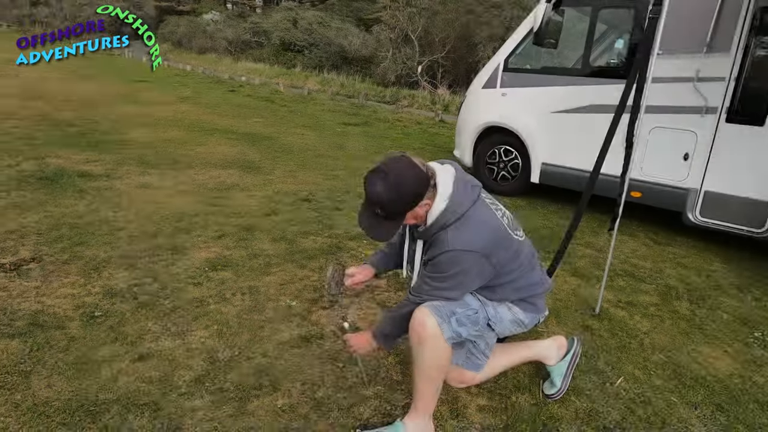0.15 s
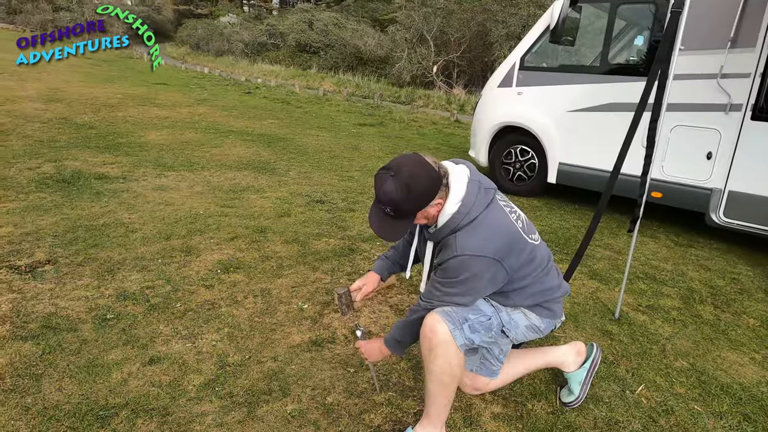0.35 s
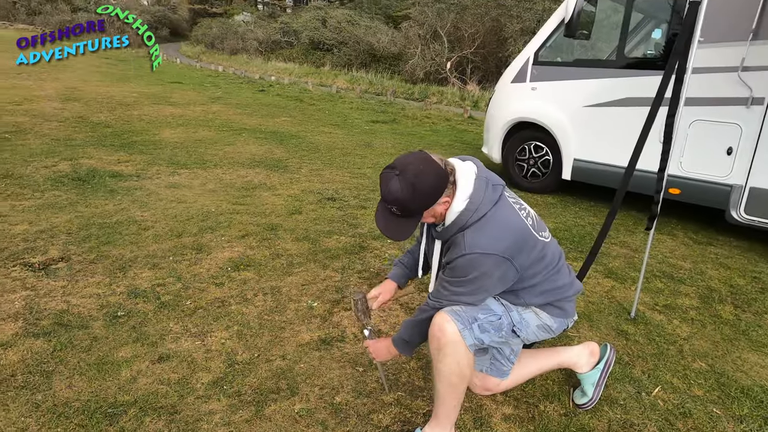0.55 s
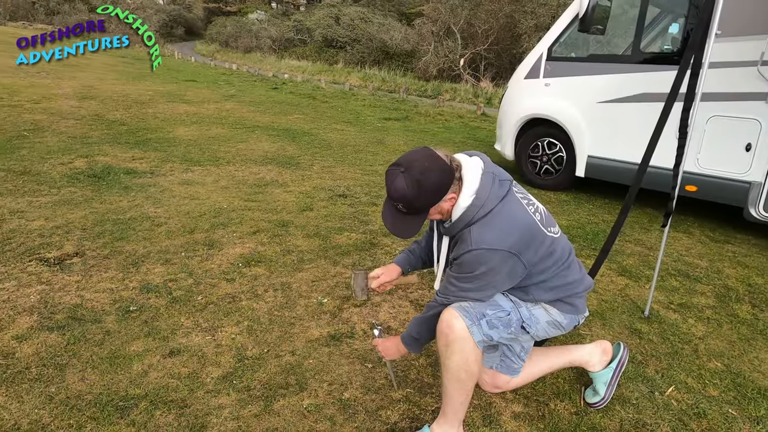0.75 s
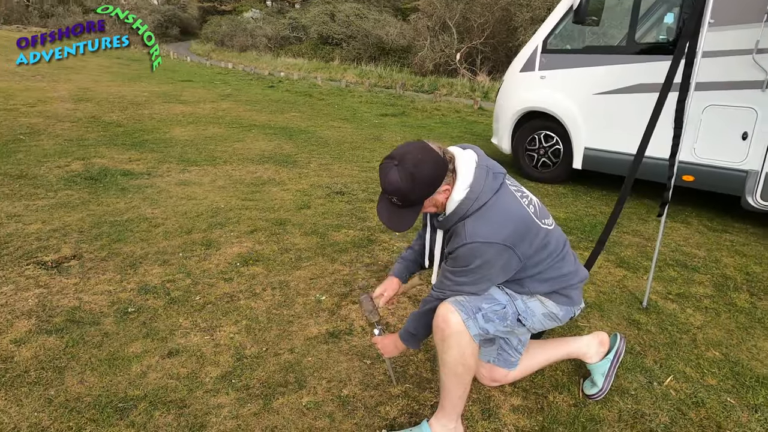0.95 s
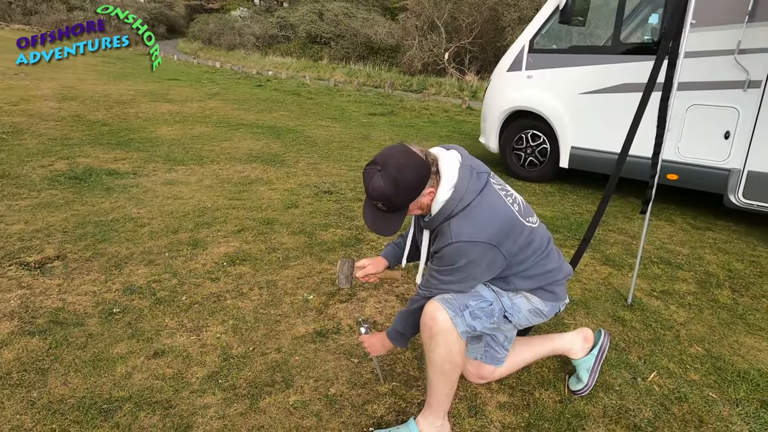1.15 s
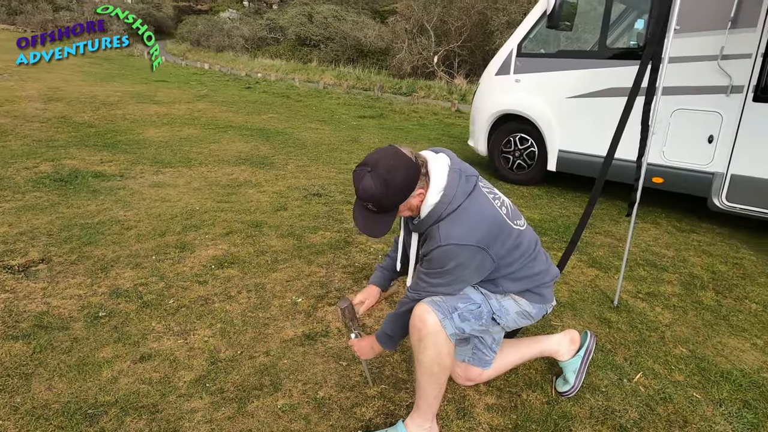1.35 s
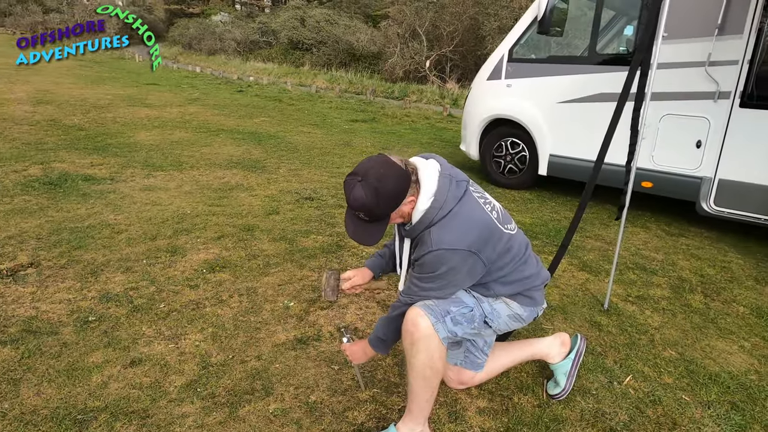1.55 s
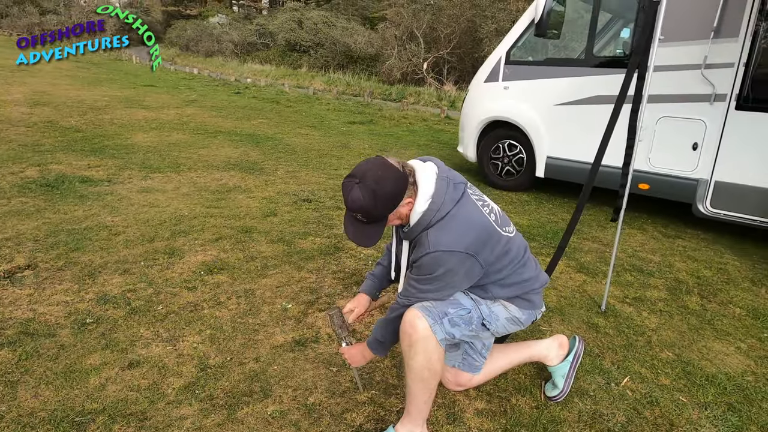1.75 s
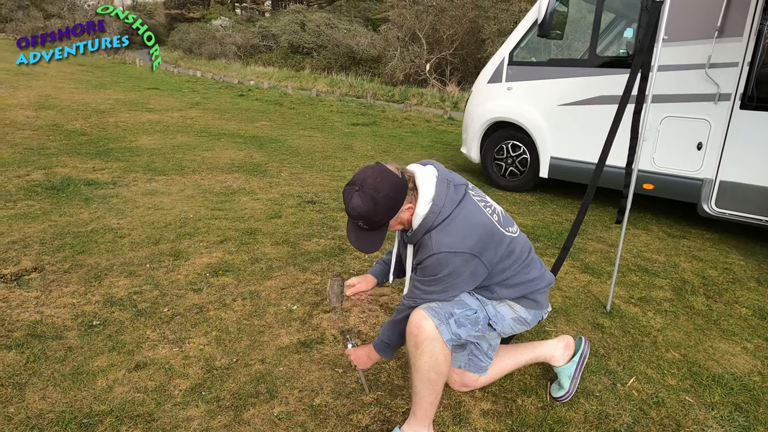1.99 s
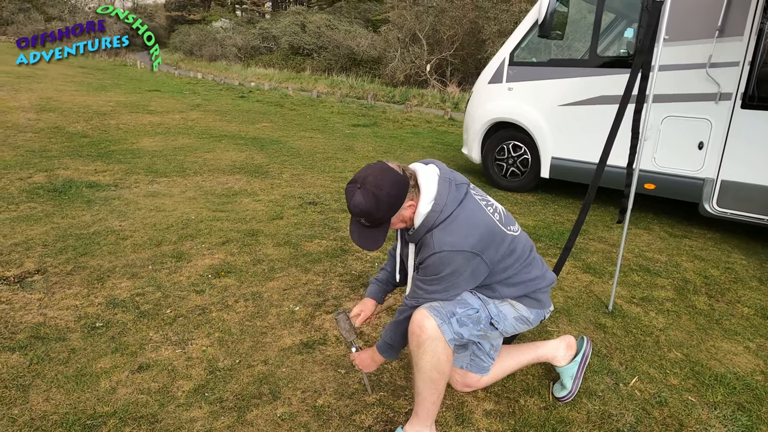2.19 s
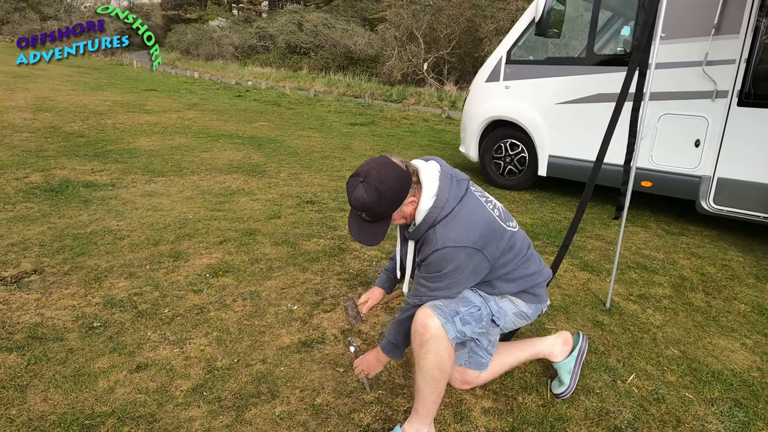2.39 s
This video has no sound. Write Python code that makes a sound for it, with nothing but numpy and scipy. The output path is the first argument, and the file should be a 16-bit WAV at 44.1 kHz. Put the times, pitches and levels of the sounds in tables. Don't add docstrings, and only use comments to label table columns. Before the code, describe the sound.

Seven sharp, bright hammer blows on a metal peg in grassy soil, roughly every 0.4 seconds, each with a brief clink and outdoor echo, over low rumble; stereo microphone a few metres away.

```python
import sys
import numpy as np
from scipy import signal
from scipy.fft import rfft, irfft, next_fast_len
from scipy.io import wavfile
from scipy.ndimage import uniform_filter1d

SR = 44100
rng = np.random.default_rng(int(sys.argv[2]) if len(sys.argv) > 2 else 0)


def elevation(decibels):
    levels = np.asarray(decibels, float)
    return 10 ** (levels / 20)


def bounce(signal):
    frames = np.transpose(np.atleast_2d(signal))
    limited = np.clip(frames, -1, 1)
    pcm = np.round(limited * 32767).astype(np.int16)
    wavfile.write(sys.argv[1], SR, pcm)


N = 106986

BLOW_START_S = [.0058, .3602, .6979, 1.0691, 1.463, 1.8727, 2.2979]
# strength in dB, brightness in dB, chatter length in seconds.
BLOW_STEEL = [(-6, -22, 0.011), (-4, -16, 0.0069), (-5, -12, 0.011), (-3.5, -19, 0.0071), (-4, -17, 0.006),
              (-3, -14.5, 0.0054), (-4.5, -19, 0.0052)]
# head ring in dB, main peg ring in dB, low body in dB, echo in dB.
BLOW_LANDING = [(-5.5, -11.5, -7.5, -1.2), (2.5, 2.5, -6.6, -1.24), (-1.5, -1.5, -0.5, 0),
                (-5, -4, -7, -2.95), (-2.5, -3, -5.7, -1), (6.5, -1.5, -3, -1.3), (18, -5.5, -3.5, .1)]
MAIN_RING_HZ = [3290, 3345, 3250, 3360, 3420, 3360, 3090]
TOP_HEAD_RING_DB = [-14, -12, -8, -7, 1, -12, 5]
# peak in dB, rebound frequency in Hz.
SOIL_THUMPS = [(-44.5, 230), (-36.5, 164), (-36, 250), (-30.5, 160), (-26, 177.4), (-26.5, 170),
               (-25.5, 165)]
REBOUND_DELAY_S = [.018, .02, .02, .0194, .0185, .0173, .0166]
PEG_RING_HZ = [1300, 1480, 2300, 2850, 4220, 5150, 5800, 7080, 7770, 8510, 9490, 10930, 13150]
# level in dB, T60 in seconds.
PEG_RINGS = [(-20, 0.032), (-13.5, .014), (-18.5, 0.06), (-52.5, 0.042), (-5.5, 0.013), (-18.5, 0.025),
             (-25, 0.012), (-0.5, 0.0053), (-32.5, 0.0053), (-14.5, 0.014), (-18.5, 0.0092), (-22, 0.033),
             (-31.5, 0.02)]
HEAD_RING_HZ = [3360, 5200, 7090, 8505, 12090]
# level in dB, T60 in seconds.
HEAD_RINGS = [(-69.5, 0.78), (-64, 0.27), (-70, 0.4), (-68.5, 0.92), (-63.5, .55)]
# frequency in Hz, level in dB.
CRACK_SPECTRUM = [(600, -47.5), (950, -28), (1300, -3.5), (2001, 7), (3700, 6.7), (5501, 2.5), (9001, -8.5),
                  (15000, -40.5)]
# frequency in Hz, level in dB.
SOIL_SPECTRUM = [(50, -13.5), (100, -0.5), (250, 1.5), (500, -18.5), (1000, -50.5)]
# delay in seconds, level in dB, smear in seconds.
WALL_ECHOES = [(0.0201, -14, 0.0065), (0.045, -29.5, 0.0027), (0.068, -29.5, 0.017), (0.131, -42.5, 0.0056)]
# frequency in Hz, T60 in seconds.
FIELD_T60 = [(300, .2), (1000, .3), (2500, .42), (5000, .36), (9000, .27), (14000, .2)]
# frequency in Hz, level in dB.
FAR_AIR_LOSS = [(3500, 0), (6000, -11), (10000, -28)]
# frequency in Hz, level in dB.
ECHO_SPECTRUM = [(200, -10.5), (800, 6.5), (2301, 1.5), (3400, -1), (6001, -3.5), (10002, -2.54),
                 (14001, -17)]
# middle in seconds,
# length in seconds, level in dB, centre in Hz.
RUSTLES = [(0.088, 0.28, -64, 2500), (0.202, .07, -56.5, 1852), (0.807, 0.48, -68.5, 2200),
           (0.982, 0.12, -57.5, 2070), (2.244, 0.17, -76, 2690), (2.344, 0.051, -43, 960),
           (0.292, 0.075, -68.5, 2600), (0.604, 0.43, -78.5, 3387), (2.359, 0.042, -42, 200)]
# start in seconds, level in dB, frequency in Hz.
KNOCKS = [
    (.052, -50.5, 600),
    (0.96, -39.5, 592),
]
# frequency in Hz, level in dB per Hz.
AIR_SPECTRUM = [(18, -32.5), (30, 3), (59, -7), (102, -18), (200, -14.5), (524, -42), (1090, -38),
                (2370, -49), (15000, -77.5)]
# frequency in Hz, likeness from 0 to 1.
AIR_LIKENESS = [(30, 0.71), (100, 1), (300, 0.62), (2000, 0.17), (10000, 0.45)]
# frequency in Hz, level in dB.
RIGHT_LIFT_DB = [(500, .3), (1500, .4), (3000, -.3), (5000, .7), (8500, 3), (13000, 2.5)]
# frequency in Hz, phase in radians.
LEFT_PHASE_RAD = [(100, 0), (700, -.25), (1400, -.45), (2800, -.8), (5600, -1.55), (7300, -1.9),
                  (9000, -.9), (12000, -1.7)]
# frequency in Hz, level in dB.
MIC_ROLLOFF = [(13000, 0), (15000, -10), (16300, -40)]
# lead in seconds, level in dB, smear in seconds.
PRE_LEAKS = [(.0109, -24, .0005), (.0215, -38, .001), (.014, -40, .006)]

CONTACTS_PER_S, CONTACT_RISE_S, CONTACT_SPREAD_DB, CHATTER_FALL_DB = 6000, .0008, 2.5, -7
MAIN_T60_S, MODE_SPREAD_DB, CRACK_DB, ECHO_RING_DB = .03, 2, 17, -11
PUSH_HZ, PUSH_S, PUSH_WIDTH_S = 255, .0052, .002
REBOUND_DB, REBOUND_WIDTH_S, REBOUND_T60_S = 2.7, .004, .022
SHUDDER_DB, SHUDDER_T60_S = -8, .22
FIELD_DB, FIELD_START_S, FIELD_RISE_S = -18.5, .0098, .0065
FIELD_END_S, FIELD_END_DB = .113, -7
FAR_DB, FAR_T60_S = -48.5, 2.3
AIR_DB, PATCH_DB, GUST_DB = -53, 4.7, 4.5
HUM_HZ, HUM_WIDTH_HZ, HUM_DB = 47, 18, -60
LEAD_IN_S = .5


def read(points, hz):
    f, value = np.transpose(points)
    return np.interp(np.log(hz + 1), np.log(f + 1), value)


def evened(x):
    return x / np.sqrt(np.mean(x ** 2) + 1e-20)


def add(mix, s, sound):
    part = mix[..., round(max(s, 0) * SR):][..., :sound.shape[-1]]
    part += sound[..., :part.shape[-1]]


def colour(x, points, sign=1, phase=((1, 0),), causal=False):
    size = 2 * next_fast_len(x.shape[-1] // 2 + 2048)
    hz = np.fft.rfftfreq(size, 1 / SR)
    gain = elevation(sign * read(points, hz))
    turn = read(phase, hz)
    if causal:
        log_gain = np.log(np.r_[gain, gain[-2:0:-1]])
        turn = -signal.hilbert(log_gain).imag[:len(hz)]
    return irfft(rfft(x, size) * gain * np.exp(1j * turn), size)[..., :x.shape[-1]]


def ring(hz, db, t60_s, count):
    t = np.arange(count) / SR
    return elevation(db - 60 * t / t60_s) * np.sin(2 * np.pi * hz * t)


def chatter(length_s):
    chance, side, size = rng.random((3, 800))
    t = np.arange(800) / SR
    hold = np.minimum(t / CONTACT_RISE_S + .3, 1) * elevation(CHATTER_FALL_DB * t / length_s)
    hold = hold / (1 + (t / length_s) ** 8)
    hits = (chance < CONTACTS_PER_S / SR) * np.sign(side - .5)
    return hits * elevation(-CONTACT_SPREAD_DB * np.log(size + .05)) * hold


def peg_ring(main_hz, main_db):
    vary_db = MODE_SPREAD_DB * rng.standard_normal(len(PEG_RINGS))
    peg = ring(main_hz, main_db, MAIN_T60_S, count=20000)
    for hz, (db, t60_s), change_db in zip(PEG_RING_HZ, PEG_RINGS, vary_db):
        peg = peg + ring(hz, db + change_db, t60_s, count=20000)
    return peg


def head_ring(head_db, top_db, count):
    head = np.zeros(count)
    for hz, (db, t60_s) in zip(HEAD_RING_HZ, HEAD_RINGS):
        lift_db = top_db if hz == HEAD_RING_HZ[-1] else head_db
        head = head + ring(hz, db + lift_db, t60_s, count)
    return head


def blow(db, bright_db, chatter_s, main_hz, top_db, head_db, main_db, body_db, echo_db):
    contacts = chatter(chatter_s)
    peg = peg_ring(main_hz, main_db)
    sound = signal.fftconvolve(contacts[None], peg[None], axes=1) * elevation([[0], [ECHO_RING_DB]])
    crack = colour(np.pad(contacts, (0, 500)), CRACK_SPECTRUM, causal=True)
    add(sound, 0, elevation(CRACK_DB) * crack)
    tilt = [(2400, body_db), (3000, 0), (4500, 0), (7000, bright_db + 16)]
    sound = colour(sound, tilt, causal=True)
    head = head_ring(head_db, top_db, sound.shape[1])
    steel = sound / np.linalg.norm(sound, axis=1)[:, None] * 5 * elevation([[0], [echo_db]])
    return elevation(db) * (steel + head * [[1], [0]])


def thump(delay_s, db, hz):
    t = np.arange(12000) / SR
    since_push = t - PUSH_S
    push = np.exp(-(since_push / PUSH_WIDTH_S) ** 2)
    push = push * np.sin(2 * np.pi * PUSH_HZ * since_push * (1.3 - 40 * t))
    u = t - delay_s
    fade = np.where(u < 0, np.exp(-(u / REBOUND_WIDTH_S) ** 2), elevation(-60 * u / REBOUND_T60_S))
    rebound = elevation(REBOUND_DB) * fade * np.cos(2 * np.pi * hz * u)
    shudder = evened(colour(rng.standard_normal(len(t)), SOIL_SPECTRUM))
    shudder = shudder * np.clip(t / delay_s, 0, 1) * elevation(SHUDDER_DB - 60 * t / SHUDDER_T60_S)
    return elevation(db) * (push - rebound + shudder)


def surroundings():
    t = np.arange(SR // 2) / SR
    shared = rng.standard_normal((3, len(t)))
    taps = .8 * shared[0] + .6 * shared[1:]
    walls = np.zeros(len(t))
    for delay_s, db, smear_s in WALL_ECHOES:
        smear = np.exp(-np.maximum(t - delay_s, 0) / smear_s) / np.sqrt(smear_s * SR / 2)
        walls = walls + elevation(db) * (t > delay_s) * smear
    hz, frame_s, z = signal.stft(rng.standard_normal((2, len(t))), SR, nperseg=256)
    near_db = FIELD_DB + FIELD_END_DB * (frame_s > FIELD_END_S)
    near_db = near_db - 60 * frame_s / read(FIELD_T60, hz)[:, None]
    far_db = FAR_DB + read(FAR_AIR_LOSS, hz)[:, None] - 60 * frame_s / FAR_T60_S
    tail = z * (elevation(near_db) + elevation(far_db))
    field = signal.istft(tail, SR, nperseg=256)[1][:, :len(t)] / 30
    onset = np.clip((t - FIELD_START_S) / FIELD_RISE_S, 0, 1)
    return colour(taps * walls + field * onset, ECHO_SPECTRUM)


def rustle(length_s, db, hz):
    count = 12000
    t = np.arange(count) / SR - count / SR / 2
    grains = rng.standard_normal((2, count)) * elevation(rng.exponential(1, (2, count)))
    spectrum = [(hz / 4, -25), (hz * .53, -1.5), (hz * 1.2, -1.5), (hz * 4, -22), (hz * 8, -45)]
    band = colour(grains + 2.1 * grains[::-1], spectrum)
    return elevation(db) * evened(band) * np.exp(-(2 * t / length_s) ** 2)


def knock(db, hz):
    return sum(ring(k * hz, db - 3 * k, .012, count=2000) for k in (1, 1.7, 2.4, 3.2))


def air():
    size, hop = 2048, 256
    hz = np.fft.rfftfreq(size, 1 / SR)
    a, b, c, d, patches = rng.standard_normal((N // hop + 5, len(hz), 5)).T
    patches = uniform_filter1d(uniform_filter1d(patches, size=10, axis=0), size=12, axis=1)
    level = elevation(read(AIR_SPECTRUM, hz)[:, None] + PATCH_DB * evened(patches))
    same = np.clip(read(AIR_LIKENESS, hz), -1, 1)[:, None]
    left = a + 1j * b
    right = same * left + np.sqrt(1 - same ** 2) * (c + 1j * d)
    z = np.array([left, right]) * level
    wash = evened(signal.istft(z, nperseg=size, noverlap=size - hop)[1][:, :N])
    f = np.fft.rfftfreq(N, 1 / SR)
    hum_band = np.exp(-((f - HUM_HZ) / HUM_WIDTH_HZ) ** 2)
    hum = evened(irfft(rfft(rng.standard_normal(N)) * hum_band, N))
    gusts = evened(irfft(rfft(rng.standard_normal(N)) * (f > 1) * (f < 6), N))
    low = colour(wash, [(90, 0), (160, -40)])
    gusty = wash + low * (elevation(GUST_DB * gusts) - 1)
    return elevation(AIR_DB) * gusty + elevation(HUM_DB + GUST_DB * gusts) * hum


def scene():
    lead = round(LEAD_IN_S * SR)
    near, far = np.zeros(N), np.zeros((2, N + SR))
    blows = zip(BLOW_START_S, BLOW_STEEL, SOIL_THUMPS, REBOUND_DELAY_S, MAIN_RING_HZ,
                TOP_HEAD_RING_DB, BLOW_LANDING)
    for s, steel_row, soil_row, delay_s, main_hz, top_db, landing in blows:
        steel = blow(*steel_row, main_hz, top_db, *landing)
        add(near, s, steel[0])
        add(near, s, thump(delay_s, *soil_row))
        add(far[:, lead:], s, signal.fftconvolve(steel[1:], surroundings(), axes=1))
    for middle_s, length_s, db, hz in RUSTLES:
        add(far, middle_s + LEAD_IN_S - 6000 / SR, rustle(length_s, db, hz))
    for s, db, hz in KNOCKS:
        add(near, s, knock(db, hz))
    left = colour(near, RIGHT_LIFT_DB, -1, LEFT_PHASE_RAD)
    right = colour(near, RIGHT_LIFT_DB)
    return np.array([left, right]) + far[:, lead:][:, :N] + air()


def top_cut(x):
    return signal.sosfilt(signal.butter(12, 16640, fs=SR, output="sos"), x)


def record(dry):
    t = np.arange(1400) / SR
    heard = colour(dry, MIC_ROLLOFF)
    leak = np.zeros(len(t))
    for lead_s, db, smear_s in PRE_LEAKS:
        bump = np.exp(-((t - lead_s + smear_s) / smear_s) ** 2)
        leak = leak + elevation(db) * bump / np.sqrt(smear_s * SR)
    treble = colour(heard, [(400, -30), (1200, 0), (14000, -3)])
    smears = leak * rng.standard_normal((2, len(t)))
    ahead = signal.fftconvolve(treble[:, ::-1], smears, axes=1)[:, :N][:, ::-1]
    return top_cut(heard + ahead)


dry = scene()
out = record(dry)
bounce(out)
```